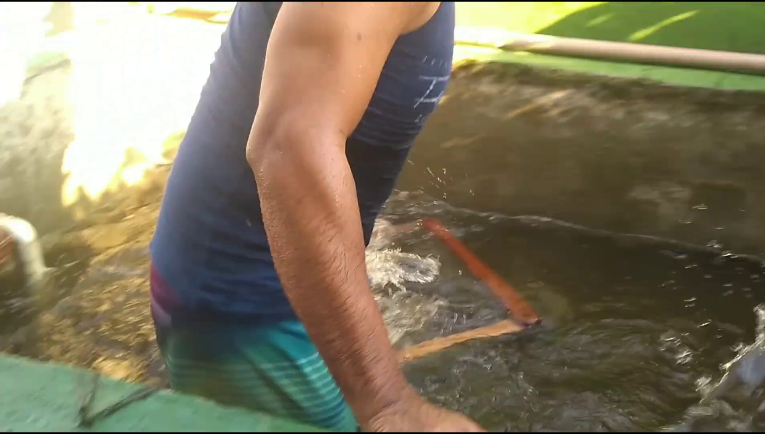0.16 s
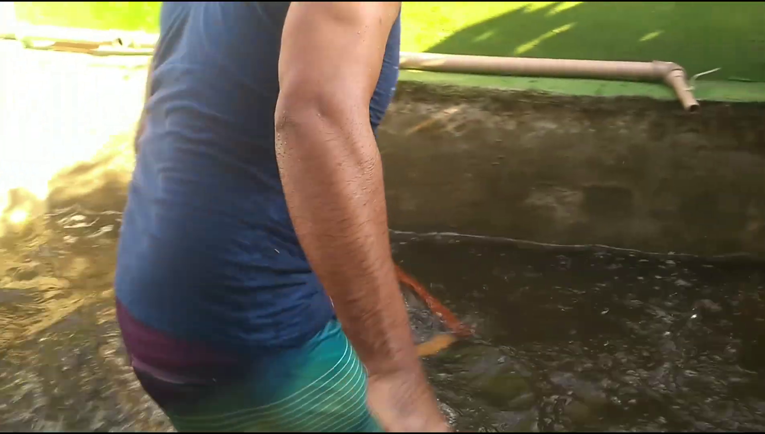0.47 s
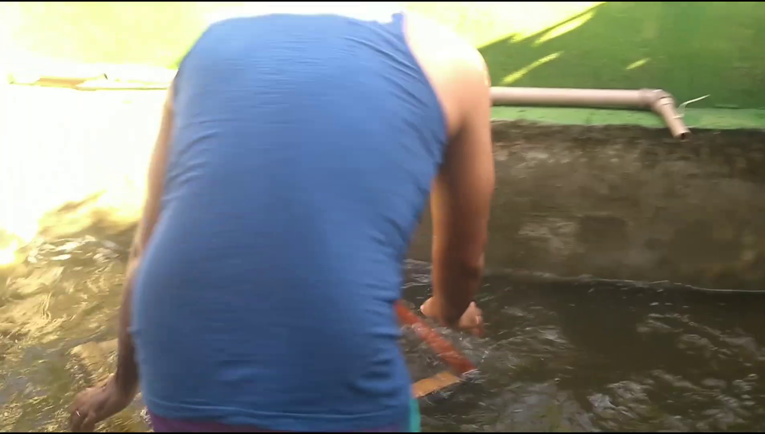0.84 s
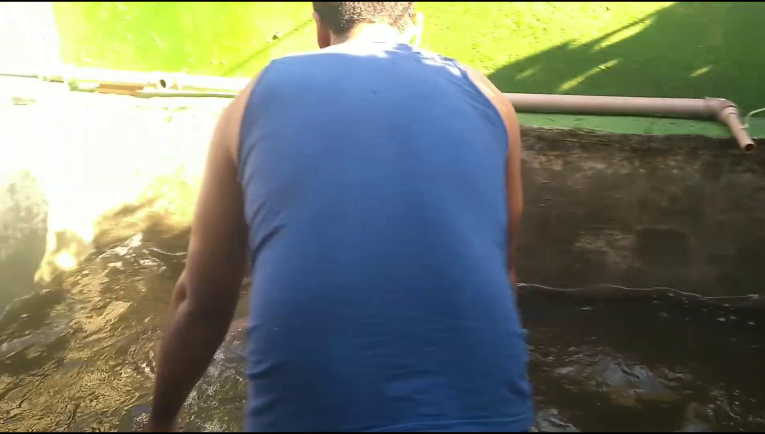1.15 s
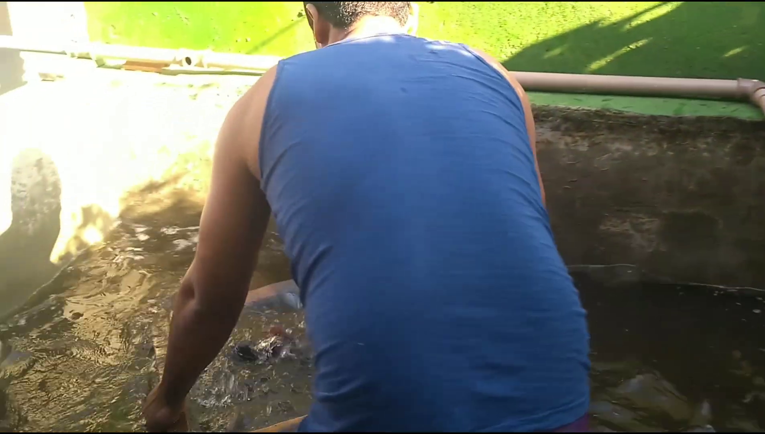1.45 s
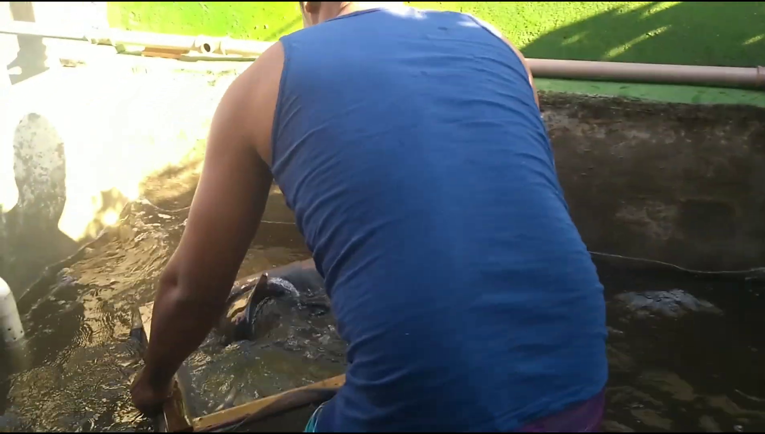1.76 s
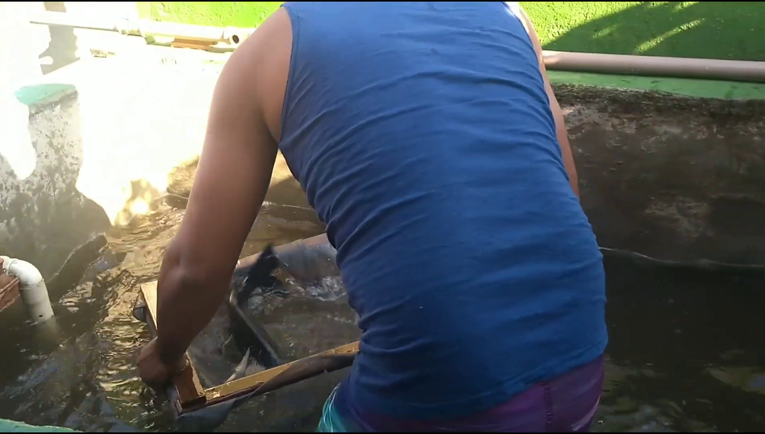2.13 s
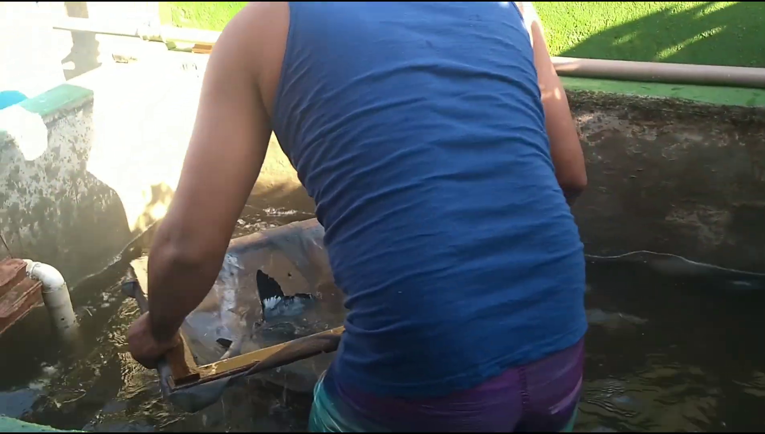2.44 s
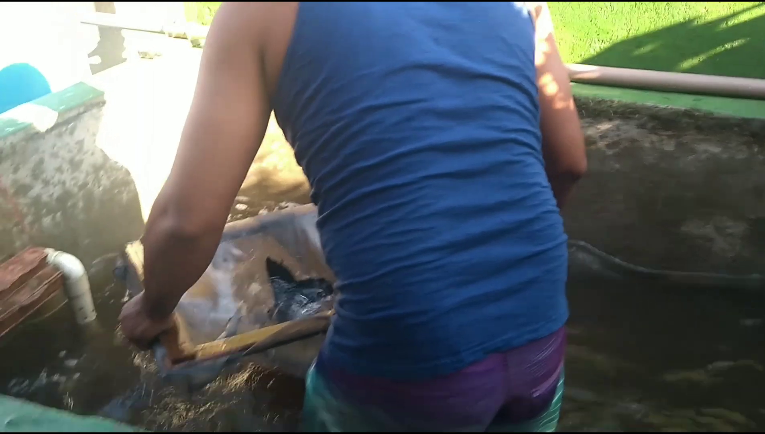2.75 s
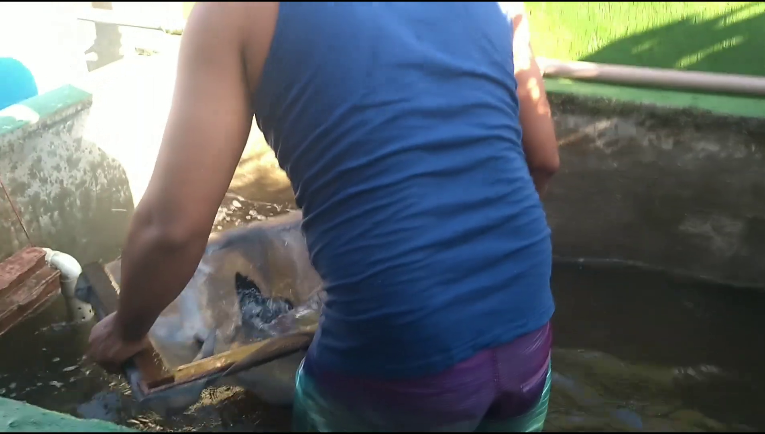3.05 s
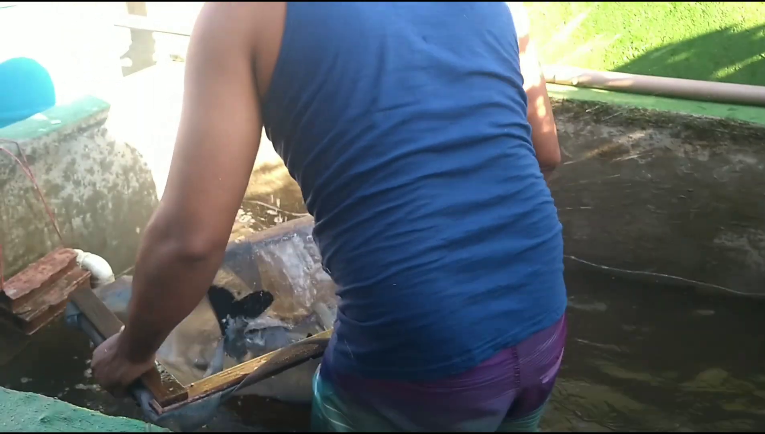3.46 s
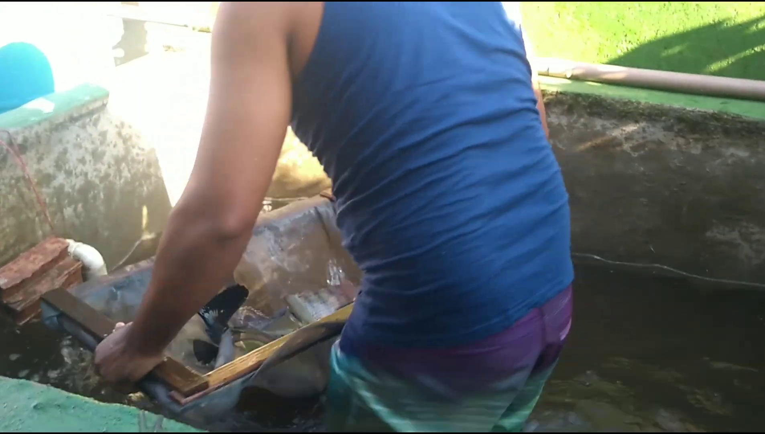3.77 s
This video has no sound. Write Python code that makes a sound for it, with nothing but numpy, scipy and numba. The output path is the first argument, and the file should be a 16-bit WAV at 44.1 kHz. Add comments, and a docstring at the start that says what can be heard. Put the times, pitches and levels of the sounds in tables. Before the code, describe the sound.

Splashing, gurgling water stirred by a net, then draining and dripping into a concrete tank.

```python
"""A small concrete tank outdoors, heard in stereo from beside the water.
A framed hand net is swept through, then lifted so that water drains through the mesh.
Clouds of bubbles ring (deep slosh, splash, fine spray), with large gulps, drips and slaps on top.
The tank walls give short echoes; far off, an engine hums and slowly speeds up."""
import sys
import numpy as np
from scipy import signal
from scipy.fft import rfft, irfft, next_fast_len
from scipy.io import wavfile
from numba import njit

SR = 44100
rng = np.random.default_rng(int(sys.argv[2]) if len(sys.argv) > 2 else 0)


def transcribe(signal):
    """Save signal, clipped to [-1, 1], as a 16-bit WAV file at the path in sys.argv[1]."""
    frames = np.atleast_2d(signal).T
    limited = np.clip(frames, -1, 1)
    pcm = np.round(limited * 32767).astype(np.int16)
    wavfile.write(sys.argv[1], SR, pcm)


N = 171990

# The water at the net. Each row: time in seconds, then the slosh, splash and spray levels in dB.
STIRRING = [(0.0, -30.5, -23.5, -26.5), (0.15, -28.5, -18.5, -26), (0.21, -28, -21.5, -26.5),
            (0.25, -22, -19.5, -25), (0.35, -27.5, -23.5, -22), (0.445, -26.5, -18.5, -25),
            (0.48, -29, -24.5, -27.5), (0.64, -30.5, -27, -29), (0.8, -39, -26.5, -30),
            (0.88, -46.5, -33, -36.5), (1.07, -47.5, -38.5, -45), (1.2, -44, -35.5, -38),
            (1.41, -43.5, -35, -41), (1.55, -43, -34, -33.5), (1.68, -42.5, -32.5, -40.5),
            (1.92, -41.5, -33, -35.5), (2.025, -45.5, -32, -35), (2.045, -29, -19.5, -28.5),
            (2.14, -36, -24, -30.5), (2.3, -37.5, -28.5, -31.5), (2.44, -41, -27.5, -28.5),
            (2.59, -39, -30.5, -31.5), (2.7, -39, -28, -33), (2.77, -34, -26.5, -24),
            (2.87, -35.5, -27, -32.5), (2.98, -32, -22.5, -25.5), (3.16, -31.5, -24, -27),
            (3.22, -46.5, -35, -38.5), (3.35, -43.5, -33.5, -39), (3.4, -31, -25, -28.5),
            (3.47, -35.5, -24, -30), (3.53, -41, -32, -35.5), (3.67, -43, -34.5, -37),
            (3.78, -43, -37, -42), (3.9, -39.5, -35, -39)]
def stirred_water():
    """The net stirs air into the water: three clouds of bubbles, the smallest ringing highest."""
    slosh = cloud(curve(STIRRING, 1), 238, 618, per_s=295, cycles=5.5,
                  scatter_db=3.5, octave_db=7, spurt_db=3.5, gain_db=-.5)
    splash = cloud(curve(STIRRING, 2), 653.5, 2144, per_s=1195, cycles=3,
                   scatter_db=3, octave_db=1, spurt_db=-22.5, gain_db=-3.5)
    spray = cloud(curve(STIRRING, 3), 2440, 14002, per_s=4804.5, cycles=3,
                  scatter_db=2.5, octave_db=-3, spurt_db=4.5, gain_db=2.12)
    return slosh + splash + spray

def cloud(level_db, lo_hz, hi_hz, per_s, cycles, scatter_db, octave_db, spurt_db, gain_db):
    """Bubbles of random size; stronger stirring makes both more and louder ones."""
    pick, when, pitch, strength, length = rng.random((30000, 5)).T
    crowding = undb(level_db) ** .7  # relative bubble rate
    live = pick < per_s * N / SR / len(pick)
    starts = np.searchsorted(np.cumsum(crowding) / crowding.sum(), when[live])
    hz = lo_hz * (hi_hz / lo_hz) ** pitch[live]
    scatter = np.minimum(-np.log(1 - strength[live]), 3.5)  # many faint, a few loud
    gains = undb(scatter_db * scatter + octave_db * np.log2(hz / lo_hz))
    gains *= np.sqrt(hz / crowding[starts]) * spurts(spurt_db, level_db)[starts]
    decay_cycles = cycles * 2 ** (2 * length[live] - 1)
    bubbles = ring(starts, hz, decay_cycles, gains)
    return unit(band(bubbles, lo_hz * .89, hi_hz * .95, order=3)) * undb(level_db + gain_db)

@njit
def ring(starts, hz, decay_cycles, gains):
    """Each bubble is a decaying sine whose pitch rises as it nears the surface."""
    out = np.zeros(N)
    glide = .042  # relative rise in pitch per decay time
    for k in range(len(starts)):
        life, phase = decay_cycles[k] * SR / hz[k], 0.
        for i in range(min(int(6 * life), N - starts[k])):
            phase += 2 * np.pi * hz[k] / SR * (1 + glide * i / life)
            out[starts[k] + i] += gains[k] * np.exp(-i / life) * np.sin(phase)
    return out

def spurts(db, level_db, per_s=24, decay_s=.0081, merge_db=-29):
    """Gain that jumps as a clump of water lands, then falls back; in a heavy flow the clumps merge."""
    when, size = rng.random((2, N))
    landings = (when < per_s / SR) * (.5 + size / 2)
    landings /= 1 + undb(level_db - merge_db) ** 2
    return 1 + undb(db) * signal.lfilter([1], [1, -np.exp(-1 / (decay_s * SR))], landings)

# Large air pockets in the tank. Each row: time of the peak in seconds, pitch in Hz, peak level in dB.
AIR_POCKETS = [(.18, 778, -8), (.181, 1106, -16.5), (.257, 506, -13.5), (.256, 1015, -14.5),
               (0.398, 1660, -13.5), (.416, 762, -10), (0.429, 287, -23.5), (.557, 360, -23),
               (.64, 507, -20.5), (0.74, 1740, -23.5), (.775, 1400, -10.5), (0.966, 1790, -22.5),
               (1.016, 1276, -26.5), (1.67, 1156, -19.5), (1.69, 940, -24), (2.053, 960, -16),
               (2.089, 955, -20), (2.13, 858, -19.5), (2.645, 963, -16.5), (2.73, 784, -17),
               (2.765, 280, -22.5), (2.858, 1010, -18), (2.885, 1010, -11), (2.968, 1850, -11),
               (3.406, 474, -23)]
def gulps(spread_s=.015, spread_octaves=.16):
    """Trapped air rings as one large bubble, and four quieter pieces break off it."""
    out = np.zeros(N)
    for s, hz, db in AIR_POCKETS:
        out += bubble(s, hz, db, swell_cycles=3)
        for late, sharp in rng.uniform(-1.1, 1, size=(4, 2)) * np.sqrt(2):
            out += bubble(s + spread_s * late, hz * 2 ** (spread_octaves * sharp), db - 8.5, swell_cycles=1)
    return out

# Drips on the surface. Each row: time of the peak in seconds, pitch in Hz, peak level in dB.
PLINKS = [(.836, 3480, -12.5), (1.1201, 2640, -17.5), (1.21, 3220, -21.5), (1.552, 3150, -17),
          (1.766, 3500, -22.5), (1.918, 3500, -23), (1.942, 3350, -15.5), (2.032, 3110, -14),
          (2.1791, 2870, -12), (2.436, 3320, -18), (2.521, 2710, -14), (2.623, 3070, -14),
          (2.808, 2980, -15), (3.081, 2800, -10), (3.151, 2850, -12), (3.4842, 2940, -6.5),
          (3.493, 2950, -20), (3.657, 3320, -19.5), (3.871, 3320, -20)]
def drips():
    """Each drip rings one small bubble, a high plink."""
    return sum(bubble(s, hz, db, swell_cycles=1.2, decay_cycles=7, glide=.025) for s, hz, db in PLINKS)

def bubble(peak_s, hz, db, swell_cycles, decay_cycles=5, glide=.04):
    """One bubble that swells, then rings down while its pitch rises."""
    age = (np.arange(N) / SR - peak_s) * hz  # in cycles from the peak
    sounding = (age > -2 * np.pi * swell_cycles) & (age < 10 * decay_cycles)
    age, out = age[sounding], np.zeros(N)
    envelope = np.exp(np.minimum(age / swell_cycles, -age / decay_cycles))
    phase = 2 * np.pi * age * (1 + glide * age / decay_cycles / 2)
    out[sounding] = undb(db) * envelope * np.sin(phase)
    return out

# Fine droplets landing. Each row: time in seconds, peak level in dB.
DROPLETS = [(.319, -10), (.922, -33), (1.12, -21), (1.48, -28), (1.571, -14.5), (1.606, -19), (1.903, -24),
            (1.968, -23), (2.163, -17), (2.3495, -14), (2.56, -15), (3.159, -9), (3.324, -11),
            (3.7028, -18)]
def droplet_ticks(hz=8000, decay_s=.0025):
    """Fine droplets tick as they hit the water."""
    return impacts([(s, db, hz, decay_s) for s, db in DROPLETS], band_ratio=1.36, swell=.19)

# Slaps at the surface, then knocks from under it.
# Each row: time in seconds, peak level in dB, band centre in Hz, decay in seconds.
WATER_SLAPS = [(.1685, -9.5, 4930, 0.0068), (.8066, 1.5, 5660, 0.00087), (1.249, -17, 1470, 0.0032),
               (1.318, -20, 4400, 0.012), (1.512, -15.5, 4700, 0.0045), (2.0326, -15, 1440, 0.0013),
               (2.046, -16.5, 725, 0.021), (2.348, -6, 4460, 0.004), (2.406, -15, 4900, 0.015),
               (2.9645, -6, 2340, 0.005), (3.076, -5, 2800, 0.0054), (3.157, -4, 2930, 0.0064),
               (3.371, -13, 1500, 0.003), (3.4015, -8, 5800, 0.0065), (3.4845, -8, 2340, 0.0027)]
NET_KNOCKS = [(1.472, -23.5, 96, 0.0068), (3.396, -22, 187, 0.0073)]
def slaps_and_knocks():
    """Water slaps the surface and the frame; the net knocks and plunges dully under water."""
    return impacts(WATER_SLAPS + NET_KNOCKS, band_ratio=1.72, swell=.32)

def impacts(rows, band_ratio, swell):
    """Short bursts of noise that swell for a share of their decay time, then die away."""
    out, t = np.zeros(N), np.arange(-SR // 50, SR // 5) / SR
    for s, db, hz, decay_s in rows:
        envelope = np.exp(np.minimum(t / swell, -t) / decay_s)
        burst = band(rng.standard_normal(len(t)) * envelope, hz / band_ratio, hz * band_ratio)
        add(out, s + t[0], burst * undb(db) / np.abs(burst).max())
    return out

# Echoes off the nearby concrete. Each row: delay in seconds, gain in dB.
WALL_ECHOES = [(.0068, -12), (0.0122, -11.5), (0.018, -12.5)]
# The side signal between the two microphones, mostly treble. Each row: frequency in Hz, gain in dB.
STEREO_SIDE = [(1700, -61), (3200, -34.5), (4400, -4), (12000, -7)]
def tank(water, wander_s=.001026, wander_hz=12.5, tail_t60_s=.16):
    """Wall echoes and a short tail; the splashes move about, so paths shift and the treble spreads."""
    samples, t = np.arange(N), np.arange(SR // 2) / SR
    echoes, tail, side = 0, 0, 0
    for delay_s, db in WALL_ECHOES:
        path_s = delay_s + wander_s * wander(wander_hz)
        echoes += undb(db) * np.interp(samples - SR * path_s, samples, water)
    places = np.array([wander(wander_hz) for _ in range(10)])  # shifting shares of ten spots in the tank
    places /= np.linalg.norm(places, axis=0)
    for share in places:
        late, early = rng.standard_normal((2, len(t)))
        late *= np.exp(-np.log(1000) * t / tail_t60_s) * (1 - np.exp(-t / .001))
        early *= np.exp(-t / .0018)
        tail += signal.oaconvolve(water * share, late / np.linalg.norm(late))[:N]
        side += signal.oaconvolve(water * share, early / np.linalg.norm(early))[:N]
    mid = (water + echoes + undb(-9) * tail) * undb(-.5)
    return mid + colour(side, STEREO_SIDE) * np.array([[1], [-1]])

# An engine far off. Each row: time in seconds, firing rate in Hz, level of the second harmonic in dB.
ENGINE_RUN = [(0, 57, -52), (.9, 59.2, -51), (1.4, 61.55, -40), (2.55, 66.6, -41), (3.9, 67.7, -51.5)]
def distant_engine():
    """A wavering hum at the firing rate and, a little louder, its octave."""
    firing_hz = curve(ENGINE_RUN, 1) * (1 + .0045 * wander(top_hz=9.4))
    phase = 2 * np.pi * np.cumsum(firing_hz) / SR
    return undb(curve(ENGINE_RUN, 2)) * (undb(-3.5) * np.sin(phase) + np.sin(2 * phase))

# The open air around the tank. Each row: frequency in Hz, relative noise density in dB.
AIR_SPECTRUM = [(20, -13), (58, 8.5), (85, -0.5), (150, 2), (1000, -10), (3000, -14.5)]
def outdoor_air():
    """Steady air noise, strongest in the bass."""
    return undb(-38.5) * unit(colour(rng.standard_normal(N), AIR_SPECTRUM))

def undb(db):
    return 10 ** (np.asarray(db) / 20)

def unit(x):
    return x / np.sqrt(np.mean(x ** 2))

def curve(table, column):
    """One column of a table, joined by straight lines in time."""
    rows = np.array(table, float)
    return np.interp(np.arange(N) / SR, rows[:, 0], rows[:, column])

def wander(top_hz):
    """Smooth random motion of spread 1."""
    hz = np.arange(N // 2 + 1) * SR / N
    return unit(irfft(rfft(rng.standard_normal(N)) * np.exp(-(hz / top_hz) ** 2), N))

def add(out, start_s, sound):
    """Mix a sound in at a time."""
    i = max(int(start_s * SR), 0)
    out[i:i + len(sound)] += sound[:max(N - i, 0)]

def band(x, lo_hz, hi_hz, order=2):
    """Band-pass."""
    edges_hz = [lo_hz, min(hi_hz, SR / 2 - 20)]
    return signal.sosfilt(signal.butter(order, edges_hz, "band", fs=SR, output="sos"), x)

def colour(x, points):
    """Causal filter through (Hz, dB) points."""
    hz, db = np.array(points, float).T
    size = 2 * next_fast_len(N)
    bins_hz = np.maximum(np.arange(size // 2 + 1) * SR / size, 1)
    cepstrum = irfft(np.log(undb(np.interp(np.log(bins_hz), np.log(hz), db))))
    cepstrum[1:size // 2] *= 2  # fold to minimum phase
    cepstrum[size // 2 + 1:] = 0
    return irfft(rfft(x, size) * np.exp(rfft(cepstrum)))[..., :N]

def scene():
    """The water sounds inside the tank; engine and air lie behind it, in the centre."""
    water = stirred_water() + droplet_ticks() + gulps() + drips() + slaps_and_knocks()
    return tank(water) + distant_engine() + outdoor_air()

# The response of both microphones. Each row: frequency in Hz, gain in dB.
MIC_RESPONSE = [(100, -3.5), (1700, 3), (1980, -0.5), (2270, -8.5), (2750, -0.5), (3650, 0.5), (4100, -4.5),
                (4550, -13), (5300, -4), (6000, -3.5), (6800, -8), (7900, -2), (9100, -9.5), (12300, -11),
                (14300, -11)]
def record(dry):
    """The microphones' uneven treble, less bass on the left, and a steep top cut."""
    left_bass_hz, top_hz = 81, 14300
    left, right = colour(dry, MIC_RESPONSE)
    left = signal.sosfilt(signal.butter(1, left_bass_hz, "high", fs=SR, output="sos"), left)
    return signal.sosfilt(signal.ellip(10, .2, 80, top_hz, fs=SR, output="sos"), np.array([left, right]))

dry = scene()
out = record(dry)
transcribe(out)
```